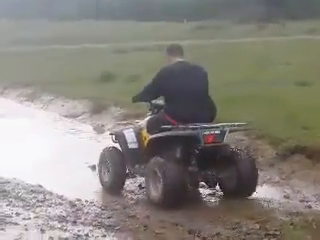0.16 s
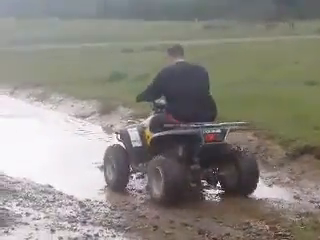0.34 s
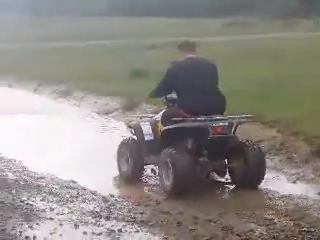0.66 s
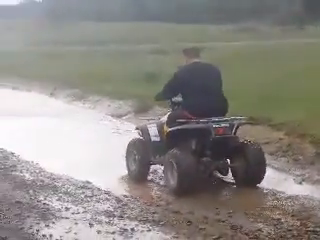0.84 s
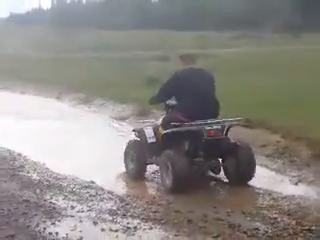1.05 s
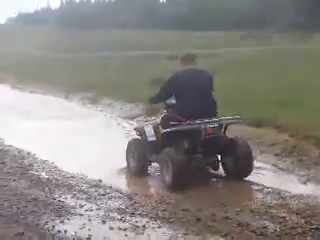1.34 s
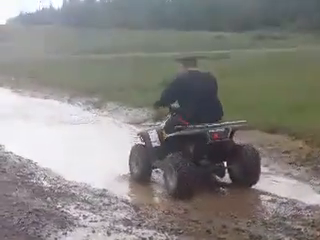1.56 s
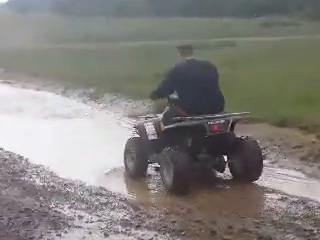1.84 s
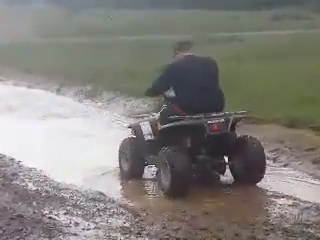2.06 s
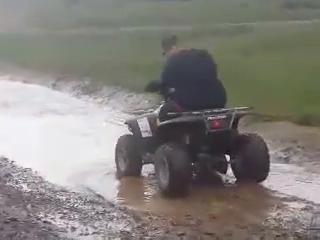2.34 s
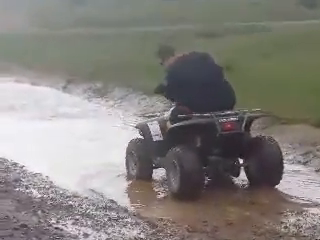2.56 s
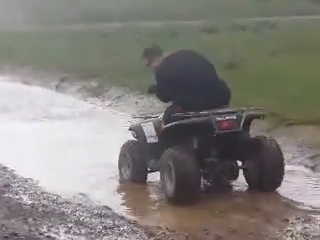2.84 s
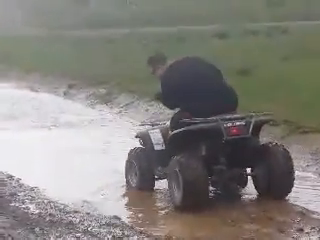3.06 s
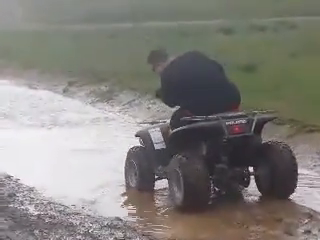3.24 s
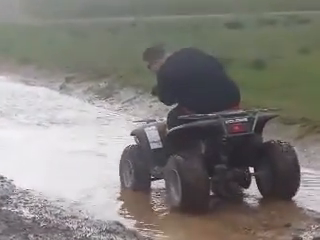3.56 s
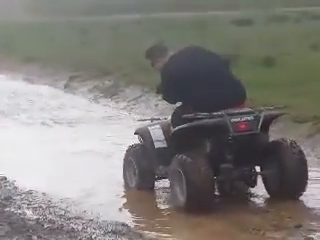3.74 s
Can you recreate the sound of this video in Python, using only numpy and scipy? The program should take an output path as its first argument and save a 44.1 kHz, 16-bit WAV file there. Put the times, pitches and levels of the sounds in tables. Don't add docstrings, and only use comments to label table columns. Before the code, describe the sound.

Outdoors, a single-cylinder engine idles unevenly, its valve gear clattering in step; it climbs to a quicker purr, slows, and cracks three times near the end, with low wind rumble on the microphone.

```python
import sys
import numpy as np
from scipy import signal
from scipy.fft import rfft, irfft
from scipy.io import wavfile
from scipy.ndimage import uniform_filter1d

SR = 44100
rng = np.random.default_rng(int(sys.argv[2]) if len(sys.argv) > 2 else 0)


def store_wav(level_fs):
    pcm = np.round(np.clip(np.atleast_2d(level_fs), -1, 1) * 32767)
    wavfile.write(sys.argv[1], SR, pcm.T.astype(np.int16))


def boost_factor(decibels):
    exponent = np.asarray(decibels, float) / 20
    return 10 ** exponent


N = 171990


def read(points, hz):
    f, value = np.transpose(points)
    return np.interp(np.log(hz + 1), np.log(f + 1), value)


def curve(table, size=N):
    rows = np.transpose(table)
    t = np.linspace(0, N / SR, size)
    return [np.interp(t, rows[0], row) for row in rows[1:]]


def evened(x):
    return x / np.sqrt(np.mean(x ** 2) + 1e-20)


def coloured(x, gain):
    return irfft(rfft(x) * gain(np.fft.rfftfreq(N, 1 / SR)), N)


def resonate(x, hz, width_hz):
    return signal.lfilter(*signal.iirpeak(hz, hz / width_hz, SR), x)


# time in seconds, firings per second.
SPEED = [(0.0, 13.04), (0.25, 12.86), (0.45, 13.2), (0.9, 12.39), (1.0, 13.31), (1.15, 14.38), (1.5, 15.84),
         (1.95, 17.03), (2.55, 20.84), (2.7, 20.88), (3.0, 17.29), (3.3, 14.98), (3.6, 12.86),
         (3.66, 13.86), (3.72, 18.23), (3.8, 21.54), (3.9, 18.43)]
START_TURN = .297


def beats(share):
    turns = START_TURN + np.cumsum(curve(SPEED)[0]) / SR
    return np.flatnonzero(np.diff(np.floor(turns - share)))


# time in seconds, exhaust thump in dB, rattle in dB, frame strain in dB.
THROTTLE = [(0, -6.5, -26, -11), (.5, -3.5, -25, -7), (.8, -2.5, -27, -0.5), (.95, -2, -29.5, 0.5),
            (1.05, -0.5, -28, 1), (1.5, -3, -25.5, -1.5), (2, -0.5, -27, 0), (2.4, -3, -25.5, -2.5),
            (2.62, 1, -27, -0.5), (2.72, -9.5, -28.5, 1), (2.85, -9, -30.5, 0.5), (3.1, -14, -28, -2),
            (3.4, -7.5, -31.5, 0), (3.6, -6, -32, -0.5), (3.66, -1.5, -31.5, 1.5), (3.76, -1, -30, 1.5),
            (3.9, -8, -28.5, 0)]
# centre in Hz, width in Hz, level in dB.
SILENCER = [(114.9, 13.8, 8), (278, 45, -0.5)]
THUMP_DB, THUMP_LAG_S = -3.5, 0.00013
BLOW_S, PUFF_S, LEAD, LEAD_S = .002, 0.0013, 0.52, 0.00084
PIPE_S, PIPE_ECHO, PIPE_LOSS_HZ, OUTLET_HZ = 0.00854, 0.61, 458, 59


def exhaust():
    size = 8192
    t = np.arange(size) / SR - 2 * BLOW_S
    s = 2j * np.pi * np.fft.rfftfreq(size, 1 / SR)
    puff = LEAD * np.exp(-((t + LEAD_S) / PUFF_S) ** 2 / 3) - np.exp(-(t / PUFF_S) ** 2)
    echo = PIPE_ECHO * np.exp(-s * PIPE_S) / (1 + s / (2 * np.pi * PIPE_LOSS_HZ))
    outlet = (s / (s + 2 * np.pi * OUTLET_HZ)) ** 2
    thump = irfft(rfft(puff) * (1 + echo) * outlet)
    thump *= np.minimum(np.arange(size) / (BLOW_S * SR / 2), 1) ** 2
    thump = thump + sum(boost_factor(db) * resonate(thump, hz, width_hz) for hz, width_hz, db in SILENCER)

    firing, at = np.zeros(N), beats(0)
    uneven_db = .6 * rng.standard_normal(len(at))
    firing[at - round(BLOW_S * SR * .8)] = boost_factor(curve(THROTTLE)[0][at] + uneven_db)
    right = boost_factor(THUMP_DB) * signal.oaconvolve(firing, thump / abs(thump).max())[:N]
    return np.array([np.roll(right, round(THUMP_LAG_S * SR)), right])


# frequency in Hz, level in dB.
LEFT_PORT = [(700, -2.5), (1700, -7), (3400, -9), (4600, 3), (5600, -3), (7400, -17), (10000, -16),
             (11500, -95)]
# frequency in Hz, left lead in radians.
LEFT_PHASE = [(700, 0), (1620, -3.1), (2350, -9.4), (3280, -15.7), (3800, -22), (5700, -40.8),
              (8000, -47.1), (10500, -53.4)]
SHARED = 0.49


def ports(near, other):
    f, lead = np.transpose(LEFT_PHASE)
    left = SHARED * near + np.sqrt(1 - SHARED ** 2) * other

    def path(hz):
        return boost_factor(read(LEFT_PORT, hz)) * np.exp(1j * np.interp(hz, f, lead))

    return np.array([coloured(left, path), near])


# share of cycle, broad rattle in dB, crankcase in dB, cover in dB,
# fade in seconds.
KNOCKS = [
    (.98, 3, 2.5, -10, 0.0084),
    (.145, 8.5, 3.5, 3, 0.0058),
    (.25, -5.5, 1.5, -3, 0.0038),
    (.285, 8, -5, 7, 0.0055),
    (.35, 8, -0.5, 5.5, 0.01),
    (0.458, -12.5, -5, -5.5, 0.0013),
    (.565, -5.5, 5.5, -18, 0.0019),
    (.62, 9, -6, 1, 0.0088),
    (.7, -8.5, -1.5, 6.5, 0.0041),
]
# centre in Hz, width in Hz, level in dB, dB gained per dB of strain.
CASINGS = [(1992, 81, -11.5, 2.5), (1844, 44, -18.5, 4.5), (2512, 100, -12, 3), (2765, 45, -12.5, 2),
           (2879, 28, -14.5, 2.5), (3230, 88, -21, -0.5), (3893, 126, -19, -0.55), (4930, 62, -24.5, 0.5),
           (1453, 315, -15, 0.4)]
# frequency in Hz, level in dB.
RATTLE = [(350, -2.5), (1200, -10.5), (2700, 0.5), (4200, -13.5), (5500, -15.5), (7400, 1.5), (10500, -11),
          (14000, -16)]
# centre in Hz, width in Hz, level in dB, extra at left port in dB.
BELLS = [(1564, 16, -43, 3), (1985, 16, -35.5, 0), (3868, 16, -37.5, -5), (4382, 25, -49, 0)]
KNOCK_SPREAD_DB, BETWEEN_DB, BROAD_DB = 1.6, -2.5, 10
BLOW_DB, COASTING_GAIN = 0.88, .6
CLICK_SHARE, COVER_LOW_HZ, COVER_HIGH_HZ = 1.1, 2300, 3500


def rattle():
    load_db, level_db, strain_db = curve(THROTTLE)
    shake, clicks = np.full((3, N), boost_factor(BETWEEN_DB)), np.zeros((3, N))
    for share, *part_db, fade_s in KNOCKS:
        hits, at = np.zeros((3, N)), beats(share)
        knock_db = KNOCK_SPREAD_DB * rng.standard_normal(len(at))
        if share > .9:
            knock_db = knock_db + BLOW_DB * (load_db[at] + 8.5)
        hits[:, at] = boost_factor(np.c_[part_db] + knock_db)
        shake += signal.lfilter([1], [1, -np.exp(-1 / (fade_s * SR))], hits)
        clicks += hits
    shake = [evened(row) for row in uniform_filter1d(shake, size=90)]

    def broad_gain(hz):
        return boost_factor(read(RATTLE, hz)) * hz ** 2 / (hz ** 2 + 300 ** 2)

    pair = []
    grit = 1.49 * np.tanh(rng.standard_normal((len(CASINGS), N)))
    for noise in rng.standard_normal((2, N)):
        rings = np.zeros(N)
        for (hz, width_hz, db, slope), taps in zip(CASINGS, grit):
            part = 2 if COVER_LOW_HZ < hz < COVER_HIGH_HZ else 1
            drive = noise * shake[part] + CLICK_SHARE * taps * evened(clicks[part])
            ring = resonate(drive, hz, width_hz) * np.sqrt(SR / 2 / width_hz)
            rings += boost_factor(db + slope * strain_db) * ring
        broad = coloured(noise * shake[0], broad_gain)
        pair.append(boost_factor(level_db) * (boost_factor(BROAD_DB) * broad + rings))
    out = ports(*pair)

    bell_hits = clicks[1] * boost_factor(-COASTING_GAIN * load_db)
    for hz, width_hz, db, left_db in BELLS:
        bell = evened(resonate(bell_hits, hz, width_hz))
        out = out + boost_factor([[db + left_db], [db]]) * ports(bell, bell)
    return out


# time in seconds, level in dB.
BREEZE = [(0, -11), (.15, -10), (.45, -11), (.7, -12), (.85, -16), (1.1, -14), (1.5, -14), (1.8, -16.5),
          (1.95, -13), (2.3, -13.5), (2.6, -15), (2.72, -8.5), (3, -8.5), (3.25, -10), (3.5, -9),
          (3.75, -11.5), (3.9, -8.5)]
# centre in seconds, length in seconds, level in dB.
GUSTS = [(0.01, 0.022, -10.5), (0.34, 0.079, -19.5), (0.55, 0.062, -16.5), (0.798, 0.12, -40),
         (1.03, 0.041, -16.5), (1.113, 0.027, -29), (1.39, 0.32, -28.5), (2.053, 0.07, -33),
         (2.74, 0.066, -24), (3.097, 0.057, -23), (3.241, 0.043, -8), (3.85, 0.072, -31)]
# frequency in Hz, level in dB.
BUFFET_LEFT = [(25, -35), (45, -41), (90, -4), (160, -2.5), (300, -9), (600, -21), (1200, -33.5),
               (3000, -155)]
BUFFET_RIGHT = [(20, -84), (60, 10.5), (120, -1), (250, -2), (450, -14), (900, -21), (2000, -39)]
CALM_DB, LUMPS_DB = -26.5, 2
BRIGHTEN = 0.29


def wind():
    frames, hz = N // 256 + 5, np.fft.rfftfreq(1024, 1 / SR)
    t = np.arange(frames) * 256 / SR
    gusts = boost_factor(CALM_DB) + sum(boost_factor(db) * np.exp(-((t - s) / length_s) ** 2) for s, length_s, db in GUSTS)
    breeze_db = np.interp(t, *np.transpose(BREEZE))
    octaves = np.log2(hz[:, None] / 150 + 1)
    out = []
    for colour, db in (BUFFET_LEFT, breeze_db), (BUFFET_RIGHT, 20 * np.log10(gusts)):
        a, b, lumps = rng.standard_normal((3, 513, frames))
        lumps = uniform_filter1d(uniform_filter1d(lumps, size=5, axis=0), size=5, axis=1)
        shape = boost_factor(read(colour, hz)[:, None] + BRIGHTEN * octaves * (db + 0.5))
        shape = shape / np.sqrt((shape ** 2).sum(0))
        z = (a + 1j * b) * shape * boost_factor(db + LUMPS_DB * evened(lumps))
        out.append(signal.istft(z, nperseg=1024, noverlap=768)[1][:N] * 1.15)
    return np.array(out)


# time in seconds, level in dB, pitch in Hz.
TICKS = [
    (3.646, -4, 5500),
    (1.67, -19, 900),
]


def ticks():
    t, left = np.arange(N) / SR, np.zeros(N)
    for s, db, hz in TICKS:
        left += boost_factor(db) * np.sin(2 * np.pi * hz * (t - s)) * np.exp(-((t - s) * hz / .4) ** 2)
    return np.array([left, 0.39 * left])


# time in seconds, gas in dB, body in dB, low body in Hz, high body in Hz.
SPUTTER = [
    (3.662, -13.5, -7.5, 2073, 3380),
    (3.7234, -14, -6.5, 1736, 2960),
    (3.7747, -13, -9.5, 1970, 2640),
]
CRACK_S, CRACK_RISE_S, BODY_S, BODY_RISE_S = 0.0077, .002, 0.0034, 0.0028


def sputter():
    t, noise = np.arange(N) / SR, rng.standard_normal((2, N))
    burst, body = np.zeros(N), np.zeros(N)
    for s, gas_db, body_db, low_hz, high_hz in SPUTTER:
        since = np.maximum(t - s, 0)
        burst += boost_factor(gas_db) * np.minimum(since / CRACK_RISE_S, 1) * np.exp(-since / CRACK_S)
        swell = np.minimum(since / BODY_RISE_S, 1) ** 2
        swell = swell * np.exp(-np.maximum(since - BODY_RISE_S, 0) / BODY_S)
        tones = np.sin(2 * np.pi * low_hz * since) + 0.74 * np.sin(2 * np.pi * high_hz * since)
        body += boost_factor(body_db) * swell * tones
    pair = []
    for hiss in noise * burst:
        gas = coloured(hiss, lambda hz: 3.5 * boost_factor(read(RATTLE, hz))) + 1.37 * resonate(hiss, 4340, 900)
        pair.append(gas + body)
    return ports(*pair)


def scene():
    return exhaust() + rattle() + wind() + ticks() + sputter()


def roll_off(x):
    return signal.sosfilt(signal.butter(12, 14910, fs=SR, output="sos"), x)


# frequency in Hz, threshold
# in dB.
PATCH_FLOOR = [(4600, -30), (5450, 0), (6100, -25), (9500, -12), (11300, -1), (13000, 0), (14500, 4)]
CEILING, EDGE_HZ, TREBLE_HZ = 1.08, 14450, 9500


def record(dry):
    edge = signal.firwin(201, EDGE_HZ, window=("kaiser", 6), fs=SR)[None]
    limited = CEILING * np.tanh(dry / CEILING)
    hz, _, z = signal.stft(signal.oaconvolve(limited, edge, "same"), SR, nperseg=2048)
    patch = uniform_filter1d(abs(z), size=4, axis=1)
    patch = patch / patch[:, hz > TREBLE_HZ].mean(1, keepdims=True) ** .8
    usual = np.median(patch, axis=2)[..., None]
    z = z * (patch > usual * boost_factor(read(PATCH_FLOOR, hz))[:, None])
    mix = signal.istft(z, nperseg=2048)[1][:, :N]
    return roll_off(mix)


dry = scene()
out = record(dry)
store_wav(out)
```